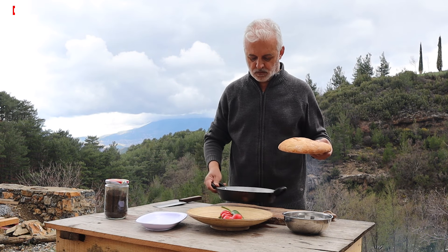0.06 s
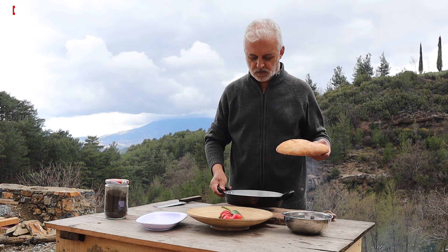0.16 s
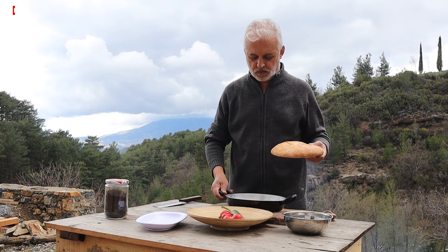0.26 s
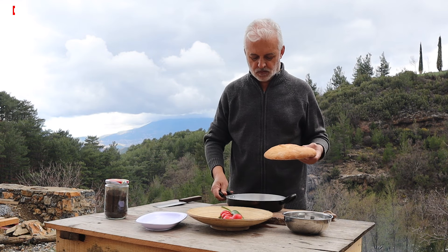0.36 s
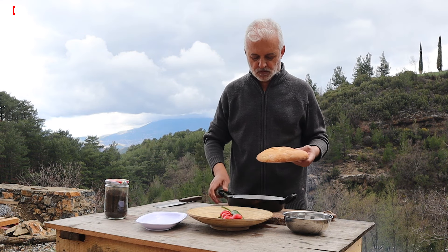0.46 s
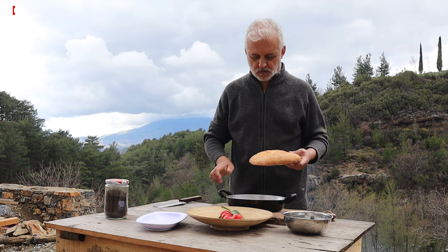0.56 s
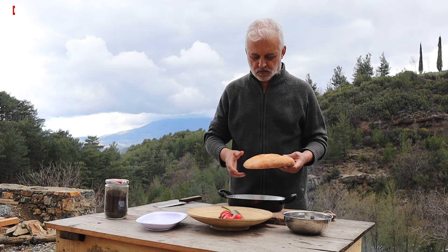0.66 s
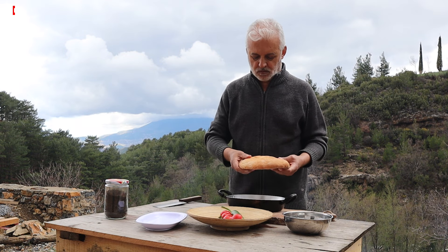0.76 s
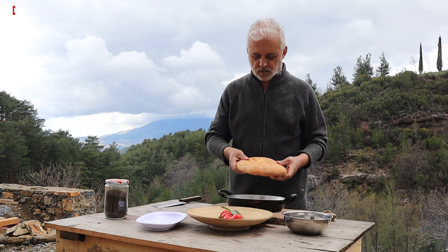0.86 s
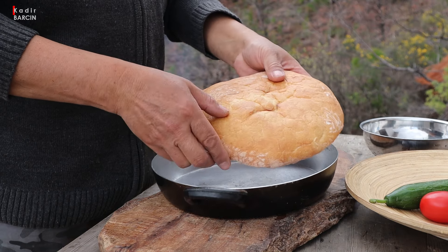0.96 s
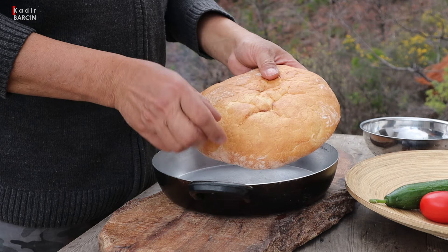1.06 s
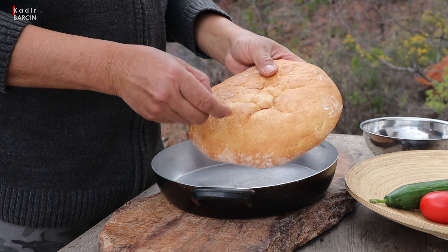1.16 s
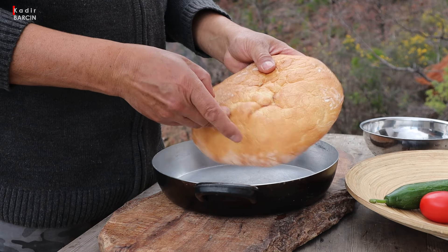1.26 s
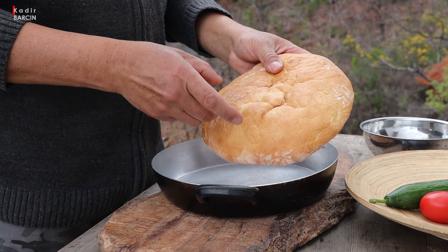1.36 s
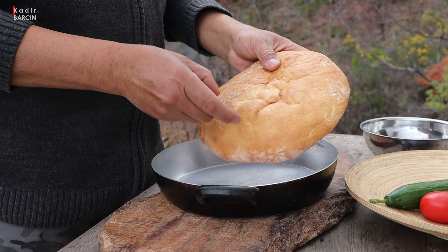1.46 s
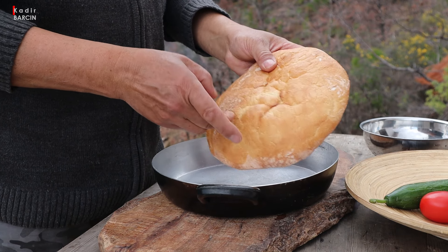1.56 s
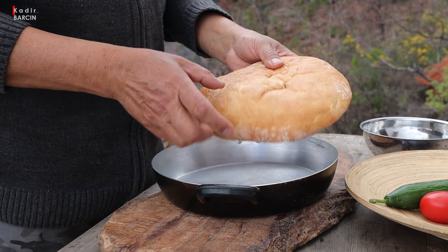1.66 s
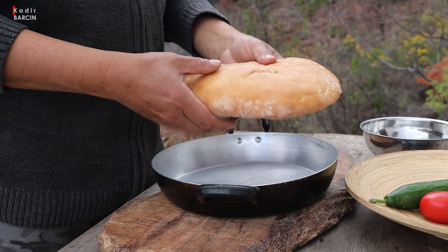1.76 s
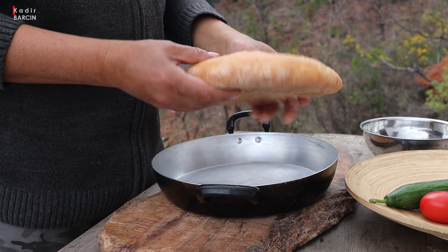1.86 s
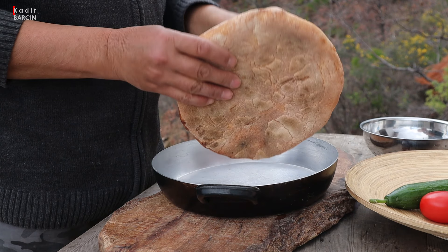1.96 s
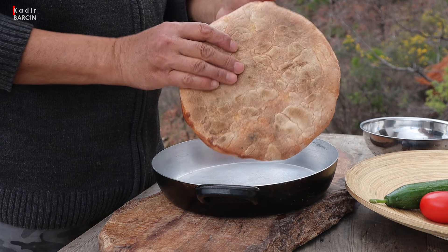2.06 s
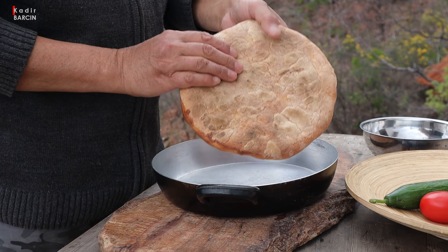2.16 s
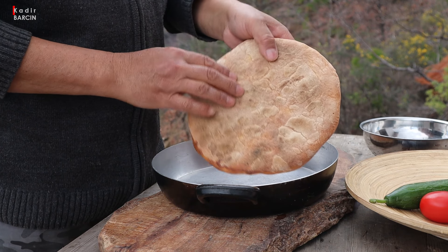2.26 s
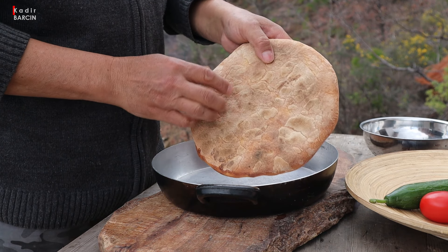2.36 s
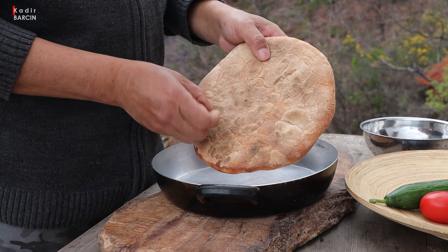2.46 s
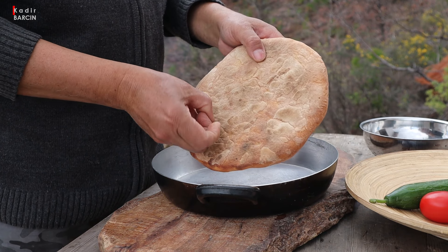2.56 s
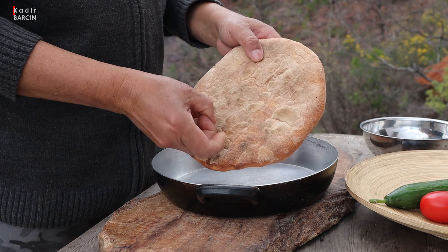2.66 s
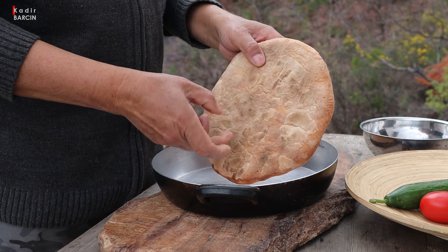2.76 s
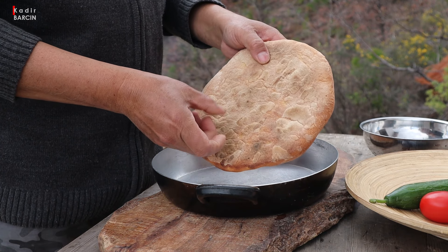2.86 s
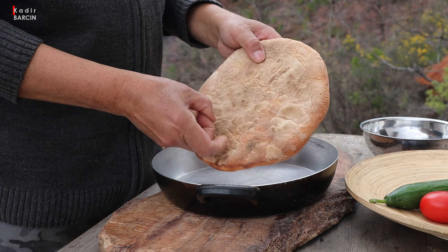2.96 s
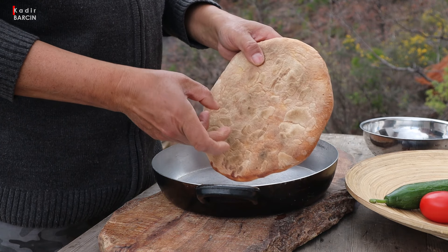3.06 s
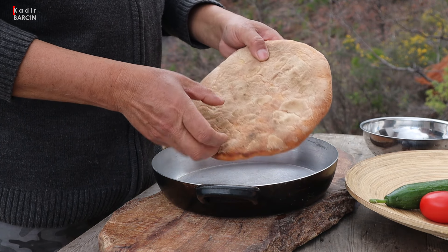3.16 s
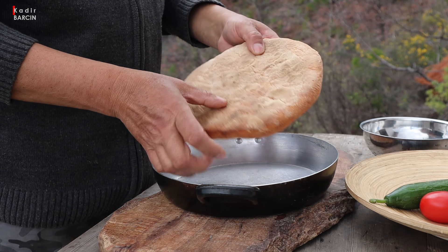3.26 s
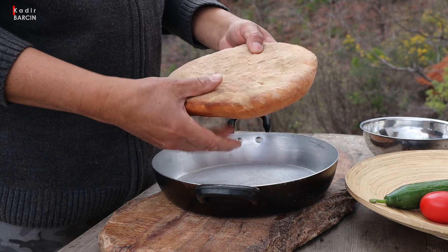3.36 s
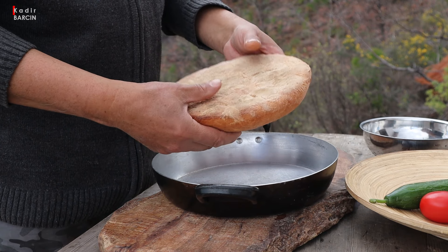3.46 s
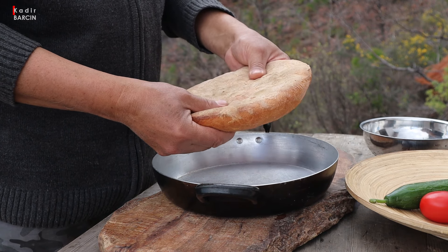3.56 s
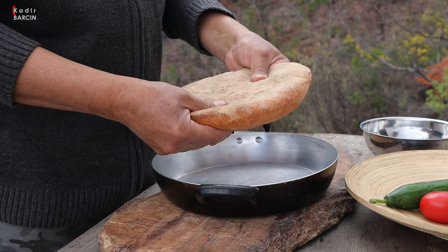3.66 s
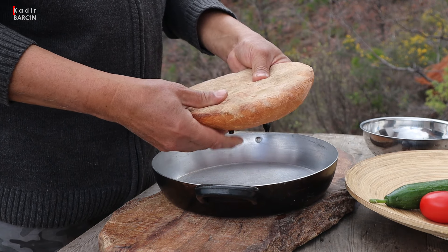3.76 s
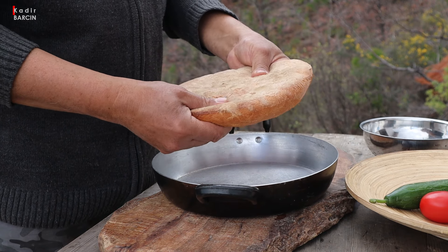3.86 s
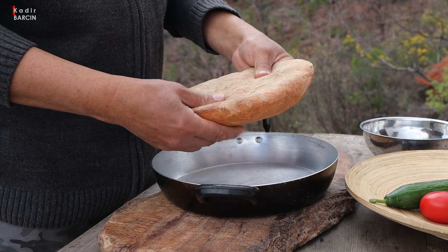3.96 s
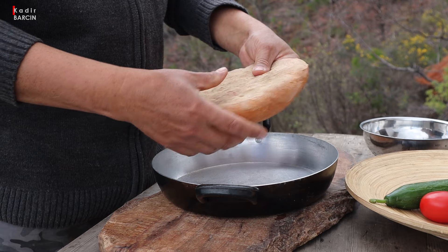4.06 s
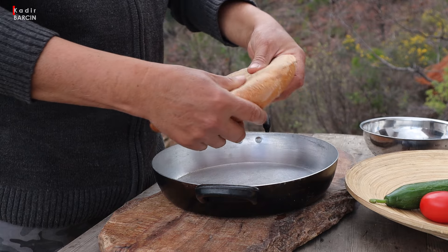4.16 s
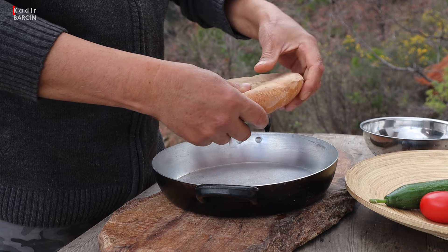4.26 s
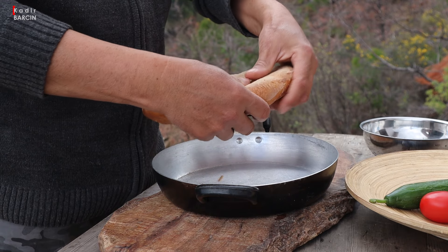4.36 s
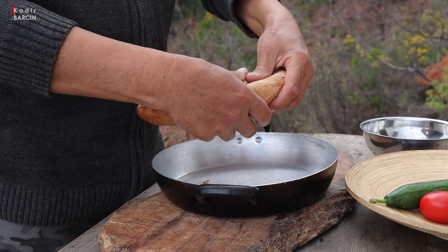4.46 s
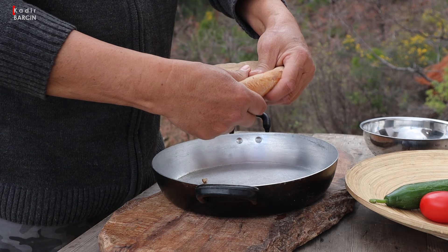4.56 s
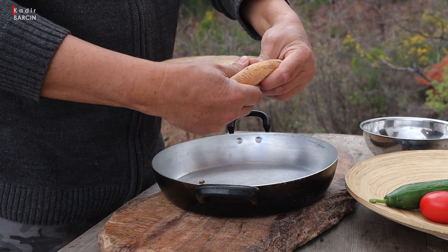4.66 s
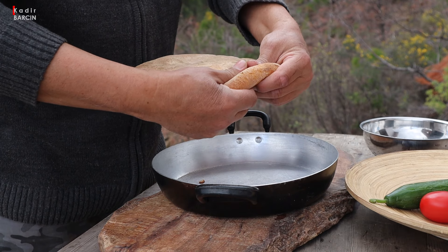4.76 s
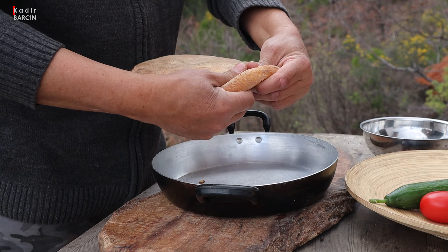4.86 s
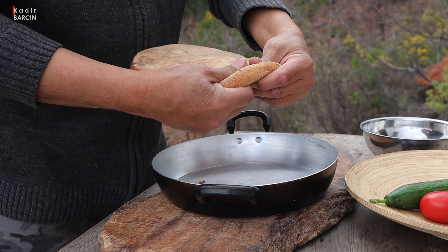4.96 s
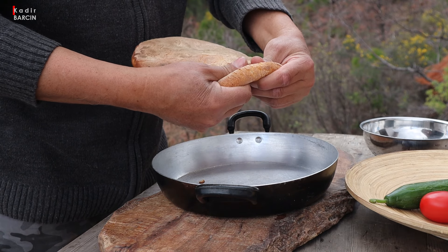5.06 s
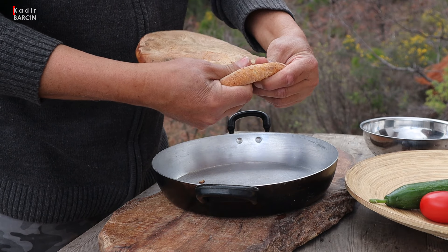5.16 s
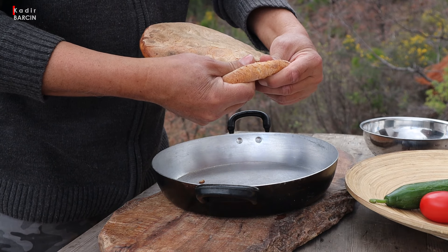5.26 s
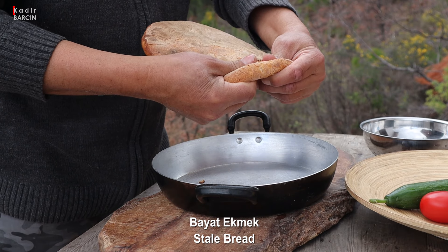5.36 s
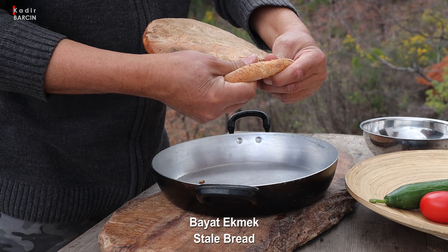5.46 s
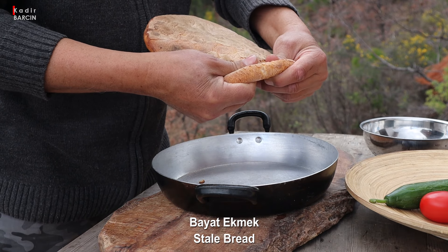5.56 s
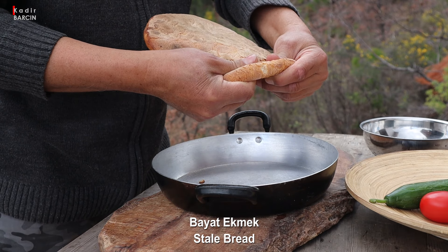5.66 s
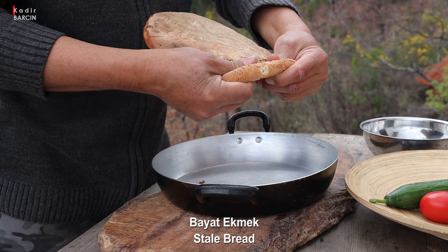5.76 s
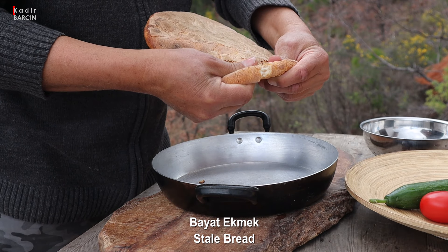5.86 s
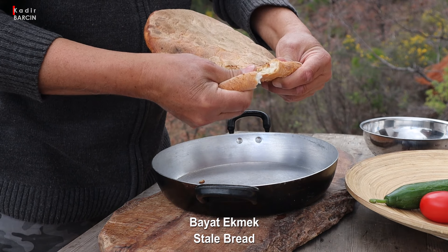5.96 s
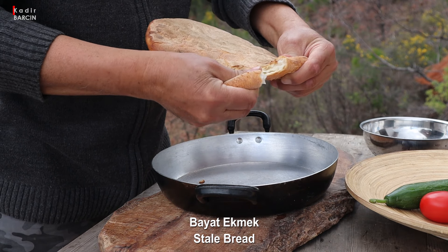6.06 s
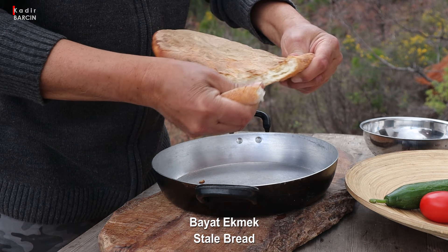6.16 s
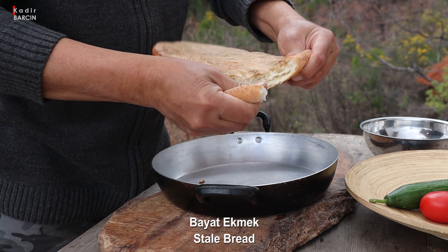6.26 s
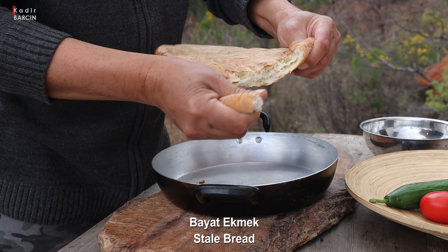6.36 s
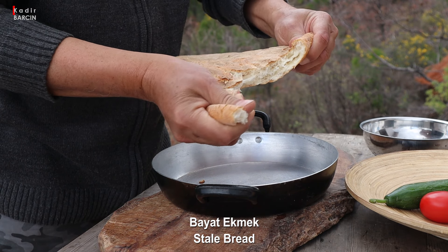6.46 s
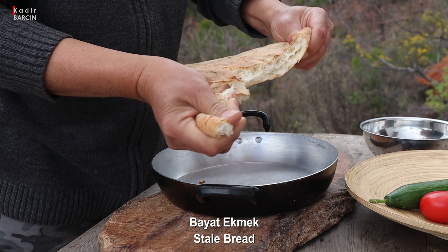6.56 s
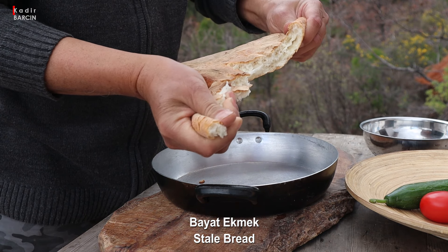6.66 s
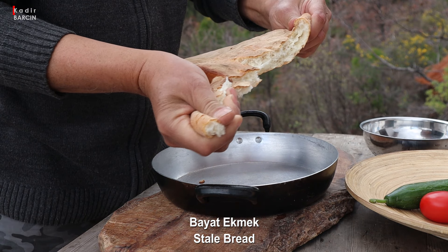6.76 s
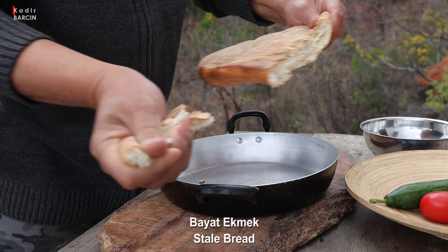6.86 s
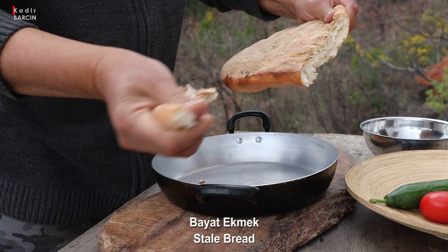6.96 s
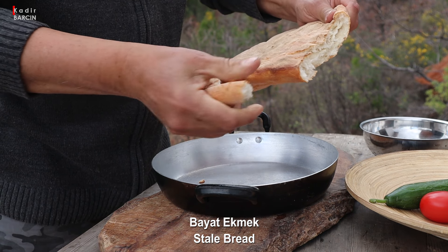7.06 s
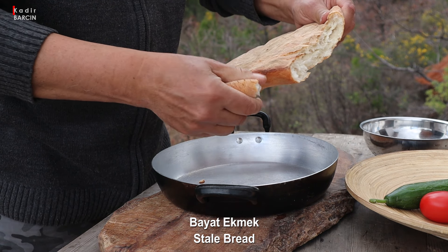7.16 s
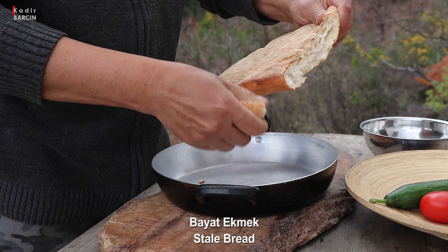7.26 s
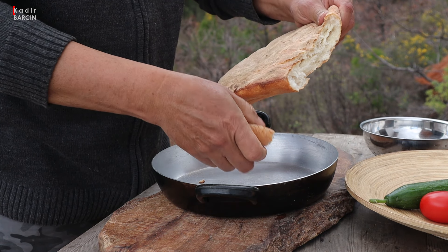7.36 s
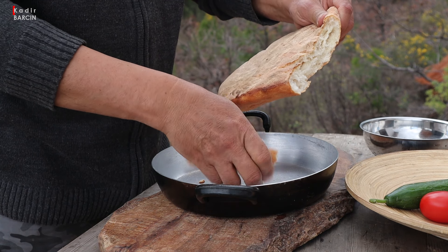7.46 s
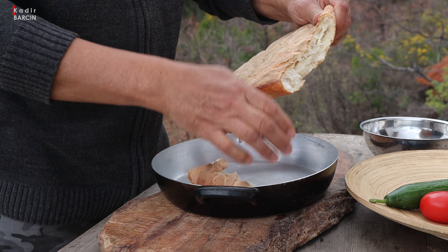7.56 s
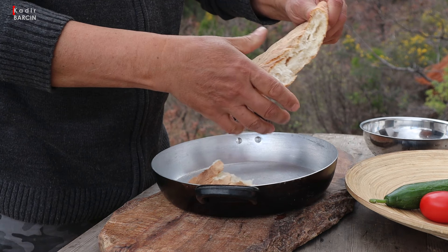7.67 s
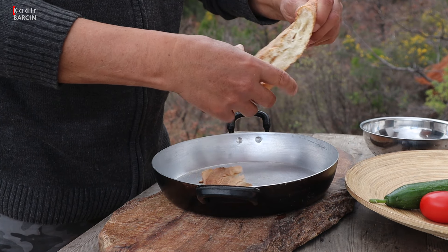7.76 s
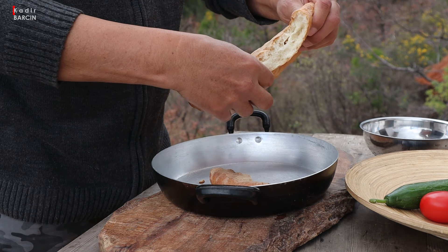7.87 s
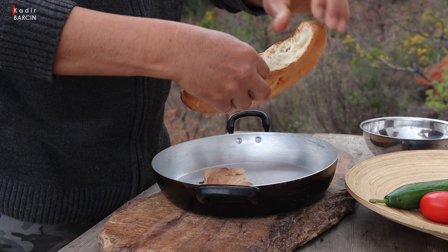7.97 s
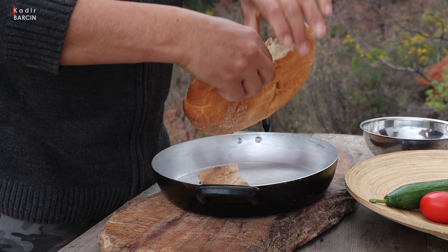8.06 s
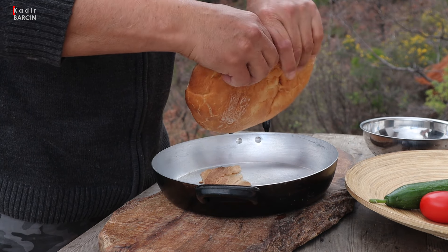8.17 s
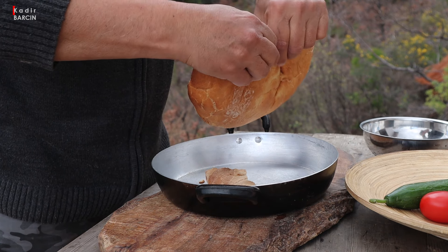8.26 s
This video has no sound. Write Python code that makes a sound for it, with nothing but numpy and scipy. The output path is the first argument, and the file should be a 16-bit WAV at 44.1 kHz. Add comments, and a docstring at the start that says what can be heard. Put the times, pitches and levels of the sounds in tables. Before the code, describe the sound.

A dull, short iron clunk on wood opens the scene, followed by a few firm hollow slaps on stale bread and soft scratchy rubbing. One sharp crust snap comes midway, then small brittle clicks and ripping crumb as the loaf is torn. The piece drops into the pan with a ringing clatter and low boom. Close microphone, outdoors, almost no echo, faint even air rush and a tiny distant bird.

```python
"""Outdoors, an iron pan is set on a wooden board and a stale flat loaf is slapped and rubbed.
Air pockets thump and skin claps on the crust; the crust snaps as bursts of clicks, and a piece is torn off
in a few crackling pulls and dropped into the pan, whose decaying modes ring under scraping noise.
Behind lie filtered noise for the even rush of a valley, a low rumble, and gliding tones for a small far bird."""
import sys
import numpy as np
from scipy import signal
from scipy.io import wavfile

SR = 44100
rng = np.random.default_rng(int(sys.argv[2]) if len(sys.argv) > 2 else 0)


def wav_record(signal):
    """Record a signal, one row per channel, as 16-bit PCM in the file named by sys.argv[1]."""
    frames = np.transpose(np.atleast_2d(signal))
    bounded = np.clip(frames, -1, 1)
    # unit amplitude maps onto the largest positive 16-bit level
    quanta = np.round(bounded * 32767).astype(np.int16)
    wavfile.write(sys.argv[1], SR, quanta)


N = 366471
TIME = np.arange(N) / SR
# a small flake: decay time of its splintering, lower edge of its sound
FLAKE_S, FLAKE_EDGE_HZ = 0.0015, 6100
# spectrum of friction and crackle on the crust: frequency_hz, density_db (per Hz)
RUB_SPECTRUM = [(120, -23), (600, -1), (3000, -1), (6200, -5.5), (8500, 0.5), (10300, -10.5), (13500, -4),
                (16000, -17)]


def amp(db):
    """Decibels to amplitude ratio."""
    return 10 ** (np.asarray(db) / 20)


def evened(x):
    """Scales to an rms of 1."""
    return x / np.sqrt(np.mean(x ** 2) + 1e-20)


def add(mix, s, sound):
    """Superposes a sound on the mix from time s, cut at the end of the mix."""
    part = mix[round(s * SR):][:len(sound)]
    part += sound[:len(part)]


def colour(x, points, size=2048):
    """Minimum-phase filter: the Hilbert transform of the log gain gives the phase; unit energy."""
    hz, db = np.transpose(points)
    bin_hz = abs(np.fft.fftfreq(size, 1 / SR))
    log_gain = np.log(amp(np.interp(np.log(bin_hz + 1), np.log(hz), db)))
    taps = np.fft.ifft(np.exp(np.conj(signal.hilbert(log_gain)))).real
    return signal.fftconvolve(x, taps / np.linalg.norm(taps))[:len(x)]


def drift(count, per_s):
    """Slow random wander: straight lines between per_s random knots a second, rms 1."""
    knots = np.arange(count) * per_s / SR
    return evened(np.interp(knots, np.arange(4096), rng.standard_normal(4096)))


def grains(count, per_s, spread_db):
    """Shot noise: clicks at random times, of random sign and uneven size, rms 1."""
    size = amp(spread_db * np.minimum(rng.exponential(1, count), 4.5))
    sign = rng.choice([-1, 1], count)
    return evened(size * sign * (rng.random(count) < per_s / SR))


def soften(x, hz):
    """A soft contact acts as a one-pole low-pass with its corner at hz."""
    keep = np.exp(-2 * np.pi * hz / SR)
    return signal.lfilter([1 - keep], [1, -keep], x)


def stroke(length, uneven_db):
    """Force envelope of one movement: it swells, catches unevenly and lets go."""
    count = int(length * SR)
    return signal.windows.tukey(count, 0.6) * amp(uneven_db * drift(count, 136.8))


def slaps(flat_palm_hz=260, cupping_hz=30, firm_db=-29, firm_hz=6500, db_per_octave=7):
    """Air-pocket resonance, stronger under a cupped palm, then a skin impact that brightens with force."""
    # hand landing on the loaf: start_s, force_db, pocket_pitch_hz, skin_smack_db, smack_centre_hz
    slap_table = [(.859, -34, 201, -51, 990), (1.3534, 1.5, 271, -4, 1850), (1.6073, -13.5, 290, -28, 8200),
                  (1.6224, -10, 235, -18, 7900), (1.8836, -24, 244, -31, 1200),
                  (2.134, -24.5, 240, -30, 900), (2.789, 2, 256, -0.5, 8600),
                  (3.0832, -17.5, 267, -27, 8000), (3.101, -5.5, 237, -10.5, 2600),
                  (3.493, -27, 244, -35, 8000), (3.864, -32.5, 240, -39, 8000),
                  (4.245, -34.5, 170, -44, 8000)]
    out = np.zeros(N)
    for s, force_db, pocket_hz, skin_db, bright_hz in slap_table:
        # a lower pocket note means a more cupped palm
        cupped = np.clip((flat_palm_hz - pocket_hz) / cupping_hz, 0, 1)
        add(out, s, amp(force_db) * thump(pocket_hz, cupped))
        # the treble corner is firm_hz at firm_db and doubles with every db_per_octave of force
        corner_hz = firm_hz * 2 ** ((force_db - firm_db) / db_per_octave)
        skin = soften(smack(bright_hz), corner_hz)
        # the skin follows one radian of the pocket note later
        add(out, s + 1 / (2 * np.pi * pocket_hz), amp(skin_db) * skin)
    return out


def thump(pocket_hz, cupped=0, cup_ratio=0.86, cup_q=4.8):
    """Impulse response of air pocket and loaf, with an added resonance when cupped; peak 1."""
    # air pocket and loaf under the palm: multiple_of_pocket_pitch, density_db
    pocket_spectrum = [(.15, -31), (.42, -24), (.65, -3), (1, 0), (1.4, -3), (2, -8), (3.3, -14),
                       (5.5, -27), (60, -60)]
    points = np.array(pocket_spectrum) * [pocket_hz, 1]
    thud = colour(signal.unit_impulse(SR // 10), points, size=4096)
    cup = signal.lfilter(*signal.iirpeak(cup_ratio * pocket_hz, cup_q, fs=SR), thud)
    thud = thud + cupped * cup
    return thud / abs(thud).max()


def smack(bright_hz, contact_s=0.00079, contact_db=-6, grit_s=0.0056, grit_db=-29, focus_db=4.5,
          focus_width_hz=2000):
    """Impact noise with two decays: a sharp clap on the crust, then loose grit rattling."""
    # skin on crust: frequency_hz, density_db (per Hz)
    smack_spectrum = [(300, -16), (1000, -5), (2100, 2), (3600, 0), (6300, -4.5), (8700, -1), (10500, -10),
                      (13000, -9), (16000, -18)]
    t = np.arange(SR // 10) / SR
    fade = amp(contact_db) * np.exp(-t / contact_s) + amp(grit_db) * np.exp(-t / grit_s)
    burst = rng.choice([-1., 1.], len(t)) * fade
    clap = colour(burst + signal.unit_impulse(len(t)), smack_spectrum)
    focus = signal.lfilter(*signal.iirpeak(bright_hz, bright_hz / focus_width_hz, fs=SR), clap)
    return clap + amp(focus_db) * focus


def cracks(parting_s=6.8749, parting_db=-25, parting_hz=343, parting_snap_db=-18.5):
    """Brittle fracture of the crust; as the piece parts, a snap and the thud of the recoiling loaf."""
    # loud breaks: start_s, level_db, splintering_s, lower_edge_hz
    crack_table = [(4.4236, -12.5, 0.004, 300), (5.861, -26.5, 0.0035, 3500), (5.9567, -27.5, 0.0037, 2500),
                   (5.9798, -23, 0.0018, 2000), (5.9957, -20.5, 0.001, 2000), (6.0305, -28.5, .004, 2500),
                   (6.5464, -32, .001, 4000), (6.6002, -33, .001, 3000), (6.659, -23, 0.0014, 2500),
                   (6.8157, -29, 0.0018, 3000), (6.866, -26, .004, 600), (6.944, -32, .0015, 7000)]
    out = np.zeros(N)
    for s, db, splinter_s, edge_hz in crack_table:
        add(out, s, amp(db) * snap(splinter_s, edge_hz))
    parting = amp(parting_db) * thump(parting_hz) + amp(parting_snap_db) * smack(bright_hz=2120)
    add(out, parting_s, parting)
    return out


def snap(splinter_s, edge_hz, splinter_db=-9, after_db=-24, after_factor=5):
    """Fracture avalanche: one sharp break, then dying splinters; small pieces radiate only treble."""
    # breaking crust: frequency_hz, density_db (per Hz)
    crust_spectrum = [(200, 14.5), (700, -7), (3400, 5), (6000, 3.5), (8600, 6), (10200, -7.5), (12500, 0),
                      (14000, -9), (16000, -15)]
    t = np.arange(SR // 10) / SR
    splinter_fade = amp(splinter_db) * np.exp(-t / splinter_s)
    after_fade = amp(after_db) * np.exp(-t / (after_factor * splinter_s))
    splinters = grains(len(t), per_s=9000, spread_db=2.5) * (splinter_fade + after_fade)
    breaks = colour(splinters + 2 * signal.unit_impulse(len(t)), crust_spectrum)
    return signal.lfilter(*signal.butter(3, min(edge_hz, SR / 4), "high", fs=SR), breaks)


def tearing(clump_db=1.5, clumps_per_s=260, drop_db=13, strain_curve=1.03, crumb_steepness=1.48):
    """Strain builds and lets go: crust flakes pop in clumps while the softer crumb rips beneath them."""
    # pulls on the loaf: peak_strain_s, build_up_s, release_s, crust_crackle_db, crumb_ripping_db
    pulls = [(4.435, 0.018, 0.054, -37, -41), (5.97, 0.031, 0.16, -44, -46.5),
             (6.228, 0.025, 0.079, -43, -36.5), (6.63, 0.1, 0.15, -42.5, -50),
             (6.874, 0.035, 0.0067, -37.5, -36), (8.02, 0.054, 0.027, -45.5, -37)]
    # ripping crumb: frequency_hz, density_db (per Hz)
    crumb_spectrum = [(60, -49), (130, -21), (300, 4.5), (1000, -2.5), (2200, 3), (3500, -10.5),
                      (5000, -3.5), (9000, -24), (16000, -53)]
    crust, crumb = np.zeros((2, N))
    for s, build_s, release_s, crust_db, crumb_db in pulls:
        from_peak = np.maximum((s - TIME) / build_s, (TIME - s) / release_s)
        # drop_db down at the ends of build-up and release
        strain_db = -drop_db * np.minimum(abs(from_peak), 10) ** strain_curve
        crust += amp(crust_db + strain_db)
        # the crumb gives way only nearer the peak
        crumb += amp(crumb_db + crumb_steepness * strain_db)
    clumps = amp(clump_db * drift(N, clumps_per_s))
    crackle = crust * clumps * grains(N, per_s=2600, spread_db=4.0)
    ripping = crumb * clumps * grains(N, per_s=6000, spread_db=1.0)
    return colour(crackle, RUB_SPECTRUM) + colour(ripping, crumb_spectrum)


def flakes(per_s=16, level_db=-36, spread_db=1.5):
    """Poisson process: tiny flakes spring off the strained crust at random moments."""
    # crust under strain: start_s, end_s
    working = [(4.2, 4.56), (5.8, 6.06), (6.38, 6.98)]
    strained = sum((TIME > start) & (TIME < end) for start, end in working)
    popping = strained * (rng.random(N) < per_s / SR)
    size = amp(level_db + spread_db * np.clip(rng.standard_normal(N), -2, 2))
    return signal.oaconvolve(popping * size, snap(FLAKE_S, FLAKE_EDGE_HZ))[:N]


def rubbing(catches_per_s=6500, spread_db=0.5):
    """Friction: dry skin catches on the fine roughness of the crust."""
    # fingers sliding on the crust: start_s, length_s, level_db
    rubs = [(.82, 0.04, -52), (.962, 0.024, -50), (1.837, .15, -44.5), (2.099, .36, -53.5),
            (3.364, 0.045, -45), (3.431, 0.27, -51.5), (3.797, 0.065, -45.5), (4.014, 0.11, -49),
            (4.138, 0.21, -46.5), (6.47, 0.13, -50.5), (8.18, 0.16, -51.5)]
    out = np.zeros(N)
    for s, length, db in rubs:
        force = stroke(length, uneven_db=3.0)
        add(out, s, amp(db) * force * grains(len(force), catches_per_s, spread_db))
    return colour(out, RUB_SPECTRUM)


def pan(blows, modes, scrape_s, scrape_spectrum, rock_db=3.5, chatter_db=-19, chatter_s=0.012):
    """Modal ringing with scrape and chatter; a longer contact low-passes each blow more deeply."""
    out, t = np.zeros(N), np.arange(SR // 2) / SR
    ring = np.zeros(len(t))
    for k, (hz, db, t60) in enumerate(modes):
        # the pan rocks, so each mode swells and sinks on its own
        level_db = db - 60 * t / t60 + rock_db * drift(len(t), 49.0)
        ring += (-1) ** k * amp(level_db) * np.sin(2 * np.pi * hz * t)
    fade = np.exp(-t / scrape_s) + amp(chatter_db) * np.exp(-t / chatter_s)
    for s, blow_db, contact_s, scrape_db in blows:
        scrape = colour(rng.standard_normal(len(t)) * fade, scrape_spectrum)
        add(out, s, amp(blow_db) * soften(ring + amp(scrape_db) * scrape, 1 / contact_s))
    return out


def skipping(tick_db=8, ring_db=-10):
    """Light impacts of a hard flake skipping over the iron excite only the highest modes."""
    # bounces: start_s, level_db
    skips = [(4.711, -42), (4.8438, -29), (4.897, -44), (4.958, -43)]
    # high modes of the iron: frequency_hz, t60_s
    ping_modes = [(6250, 0.032), (7165, .02), (8100, 0.037), (12300, 0.03), (13600, .03)]
    tick = snap(FLAKE_S / 2, FLAKE_EDGE_HZ)
    t = np.arange(len(tick)) / SR
    ring = sum(amp(-60 * t / t60) * np.sin(2 * np.pi * hz * t) for hz, t60 in ping_modes)
    out = np.zeros(N)
    for s, db in skips:
        add(out, s, amp(db) * (amp(tick_db) * tick + amp(ring_db) * ring))
    return out


def table(bump_db=4.0, bumps_per_s=45, boom_hz=140.8, quiet_db=-46.5, sag_hz_per_db=0.5, waver_hz=7):
    """Driven low resonance of pan on table: its pitch sags with level, and hard blows ring more evenly."""
    # pan booming on the table when brushed or struck by the landing piece: start_s, length_s, level_db
    booms = [(.96, 0.3, -47.5), (3.374, 0.067, -43.5), (3.533, 0.12, -51), (7.615, 0.034, -27.5),
             (7.675, 0.038, -32), (7.709, 0.037, -35.5), (7.755, 0.087, -47.5), (7.8, 0.21, -54.5)]
    out = np.zeros(N)
    for s, length, db in booms:
        force = stroke(length, uneven_db=3)
        unevenness_db = bump_db * min(amp(quiet_db - db), 1)
        force = force * amp(unevenness_db * drift(len(force), bumps_per_s))
        hz = boom_hz - sag_hz_per_db * (db - quiet_db) + waver_hz * drift(len(force), 60.0)
        boom = np.sin(2 * np.pi * np.cumsum(hz) / SR)
        add(out, s, amp(db) * evened(boom * force))
    return out


def yard(x, wet_db=-25, t60=0.18, delay_s=0.013, wall_db=-23, wall_s=0.04, wall_hz=225, wall_q=5):
    """Reflection: weak, short scatter from table and ground, and a dull resonant echo from the wall."""
    # scatter: frequency_hz, density_db (per Hz)
    yard_spectrum = [(80, -1.5), (900, -1.5), (3000, -5), (16000, -5)]
    t = np.arange(SR // 3) / SR
    scatter = grains(len(t), 3800, 1.0) * amp(-60 * t / t60) * (t > delay_s)
    tail = colour(scatter, yard_spectrum)
    out = amp(wet_db) * signal.fftconvolve(x, tail / np.linalg.norm(tail))[:N]
    echo = signal.lfilter(*signal.iirpeak(wall_hz, wall_q, fs=SR), x)
    add(out, wall_s, amp(wall_db) * echo)
    return out


def valley(level_db=-44.0):
    """Broadband turbulence noise: the even rush of distant trees and water, barely wavering."""
    # rush: frequency_hz, density_db (per Hz)
    valley_spectrum = [(24, -31), (40, -21), (215, -4.5), (337, -1.5), (430, -2.5), (1020, 0), (3060, -10),
                       (4930, -17.5), (8550, -22.5), (11000, -26.5), (13800, -26.5), (16000, -30.5)]
    gusts_db = 0.2 * drift(N, 3) + 0.35 * drift(N, 25)
    return amp(level_db + gusts_db) * colour(rng.standard_normal(N), valley_spectrum, size=8192)


def rumble():
    """Low-passed noise under a slow envelope: a soft low rumble that comes and goes."""
    # envelope: time_s, level_db
    rumble_levels = [(0, -76), (1.1, -57), (1.7, -68), (3.5, -74), (6.8, -92), (7.3, -66), (7.65, -62)]
    level_db = np.interp(TIME, *np.transpose(rumble_levels))
    noise = colour(rng.standard_normal(N), [(45, 2.0), (100, -0.5), (600, -30)], size=8192)
    return amp(level_db) * noise


def bird(chirp_s=0.11, arch_hz=443, warble_hz=230):
    """Frequency modulation: thin notes whose pitch rises and falls in one arch with a random warble."""
    # far notes: start_s, top_pitch_hz (before warble), level_db
    chirps = [(1.44, 4900, -62), (1.985, 4650, -60), (2.09, 4400, -60.5), (4.69, 5100, -60)]
    out, count = np.zeros(N), int(chirp_s * SR)
    below_top_hz = arch_hz * np.linspace(-1, 1, count) ** 2
    for s, top_hz, db in chirps:
        hz = top_hz - below_top_hz + warble_hz * drift(count, 502)
        note = np.sin(2 * np.pi * np.cumsum(hz) / SR) * signal.windows.tukey(count, 0.7)
        add(out, s, amp(db) * evened(note))
    return out


def scene(bass_hz=100):
    """Superposition: all that the hands do, with its reflections, over the open air."""
    # pan meeting the board, then crumb and torn piece landing in it: start_s, level_db, contact_s, scrape_db
    pan_knocks = [(.3533, -17.5, 0.00016, -3.5), (.3572, -17.5, 0.00066, -12), (.3592, -19, 0.00075, -1.5),
                  (.395, -30, 0.00096, 3.5)]
    landings = [(4.5125, -37.5, 0.000018, 2), (7.6143, -21, .00002, 6.5), (7.6236, -18.5, 0.00009, 4),
                (7.672, -31, 0.00038, 10), (7.7115, -35, 0.00077, 9.5)]
    # modes of the pan held against the board, then standing free: frequency_hz, level_db, t60_s
    held_modes = [(141, -0.5, 0.09), (530, 1, 0.076), (720, -9, 0.13), (877, -8, 0.13), (1160, -8.5, 0.11),
                  (1400, -14, 0.036), (1587, -1, .13), (2040, -17, 0.06), (2600, -9, .11),
                  (2800, -16.5, 0.13), (3570, -30, 0.12), (4390, -34, .13)]
    free_modes = [(614, 0, 0.058), (694, 2, 0.084), (770, 1, .06), (878, -10.5, 0.46), (1060, -13, 0.048),
                  (1213, -5, 0.18), (1645, -13.5, 0.32), (2085, -14, 0.29), (3279, -11, 0.41),
                  (3935, -14.5, 0.26), (4630, -19, 0.19), (5443, -17, .26), (7560, -12.5, .07),
                  (8520, -7, 0.028)]
    # iron scraping on board, then crust on iron: frequency_hz, density_db (per Hz)
    board_scrape = [(80, -5), (600, -0.5), (2400, -7.5), (4000, -28), (8500, -24), (12000, -40)]
    crust_scrape = [(450, -13.5), (720, 3), (1800, -3), (2800, -10.5), (6000, -10), (8600, -5.5),
                    (10200, -19)]
    set_down = pan(pan_knocks, held_modes, scrape_s=0.0075, scrape_spectrum=board_scrape)
    dropped = pan(landings, free_modes, scrape_s=0.0025, scrape_spectrum=crust_scrape)
    # a pan is too small to radiate deep bass
    iron = signal.lfilter(*signal.butter(4, bass_hz, "high", fs=SR), set_down + dropped)
    near = slaps() + cracks() + flakes() + skipping() + rubbing() + tearing() + iron + table()
    return (near + yard(near) + valley() + bird() + rumble())[None]


def record(dry, threshold_db=-26, share=0.15, fall_db_per_s=20, edge_hz=16100):
    """Compression by a slowly falling held level, hard clipping of overloads, and a low-pass band limit."""
    # power averaged over about 400 samples
    power = signal.lfilter([1 / 400], [1, 1 / 400 - 1], dry[0] ** 2)
    fall = TIME * fall_db_per_s
    held_db = np.maximum.accumulate(10 * np.log10(power + 1e-12) + fall) - fall
    over_db = np.maximum(held_db - threshold_db, 0)
    clipped = np.clip(dry * amp(-share * over_db), -1, 1)
    band_limit = signal.firwin(511, edge_hz, window=("kaiser", 9), fs=SR)
    return signal.oaconvolve(clipped, band_limit[None], "same")


dry = scene()
out = record(dry)
wav_record(out)
```